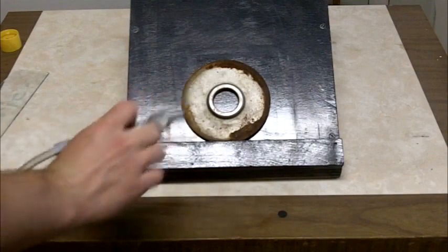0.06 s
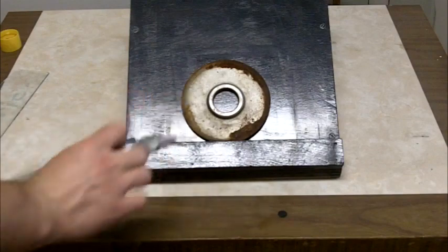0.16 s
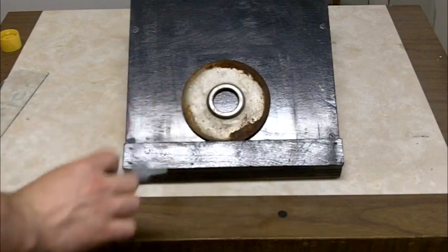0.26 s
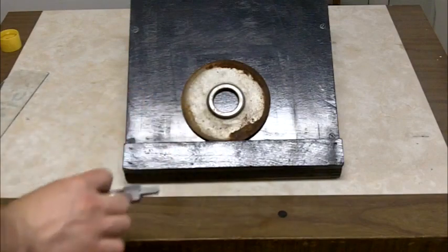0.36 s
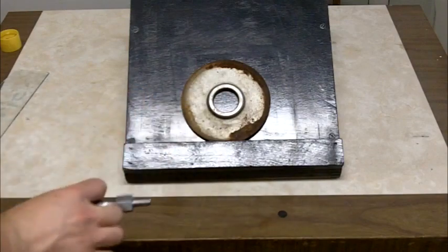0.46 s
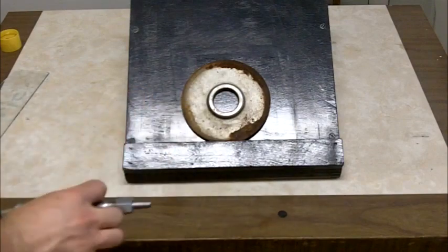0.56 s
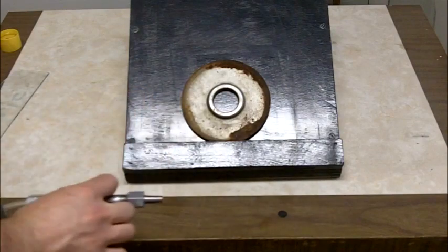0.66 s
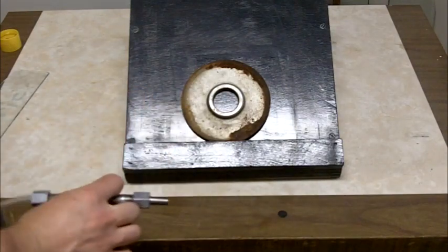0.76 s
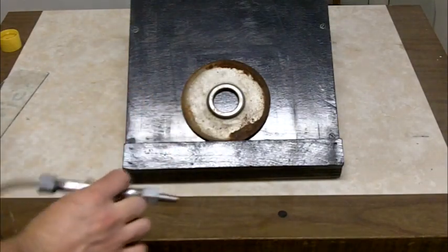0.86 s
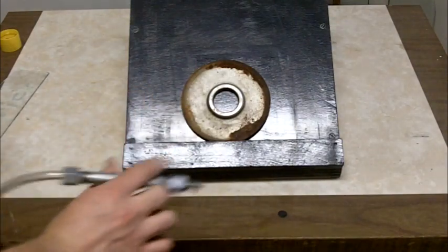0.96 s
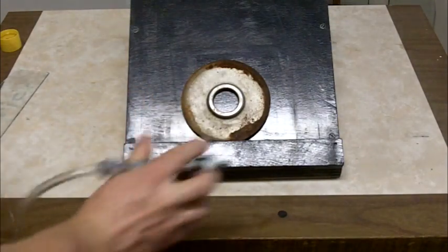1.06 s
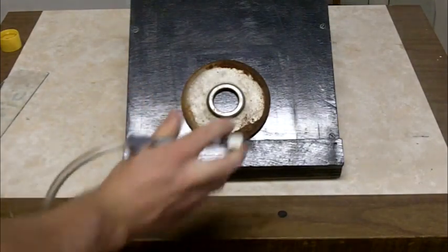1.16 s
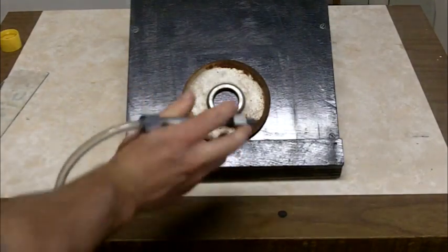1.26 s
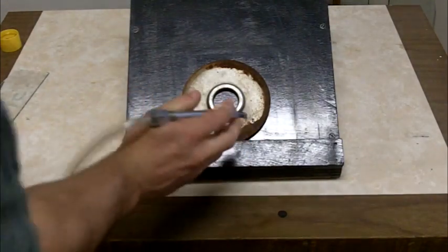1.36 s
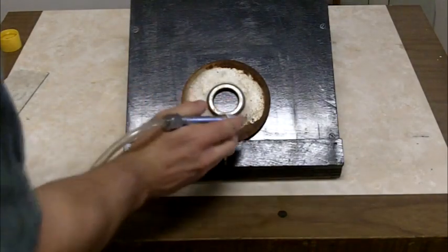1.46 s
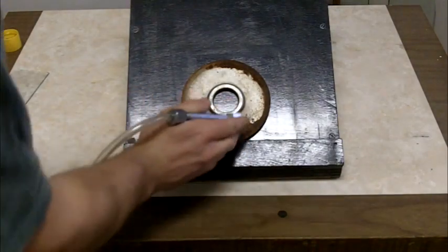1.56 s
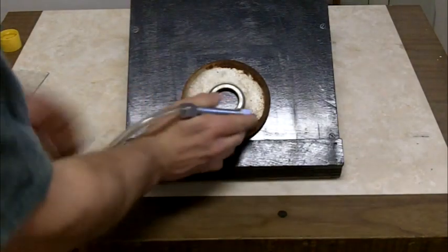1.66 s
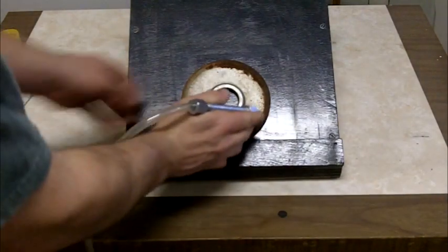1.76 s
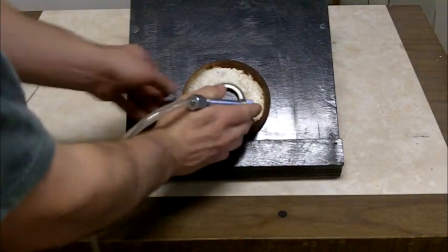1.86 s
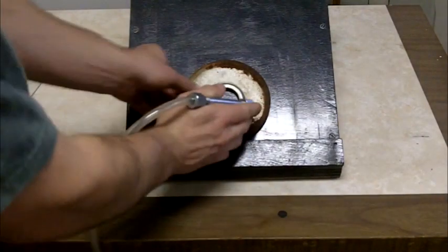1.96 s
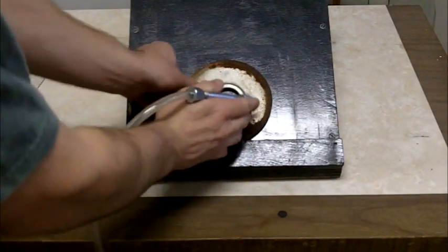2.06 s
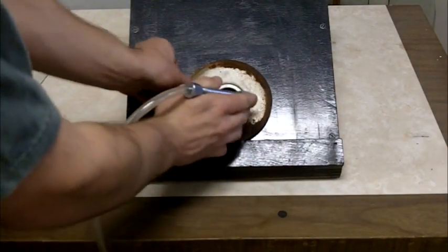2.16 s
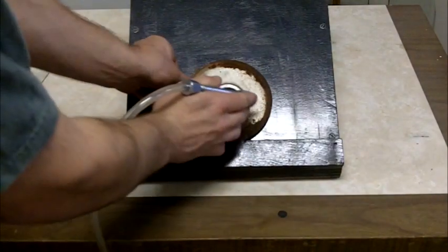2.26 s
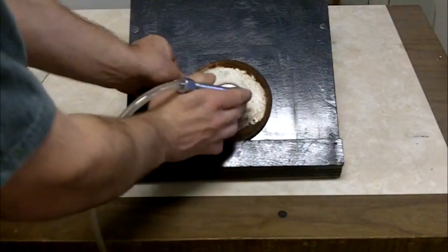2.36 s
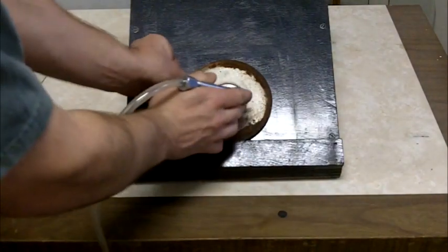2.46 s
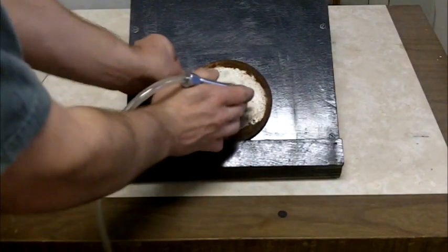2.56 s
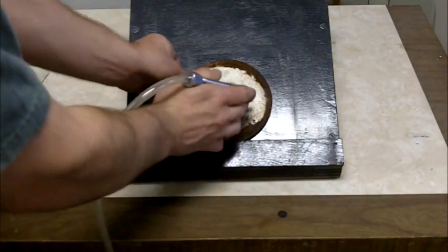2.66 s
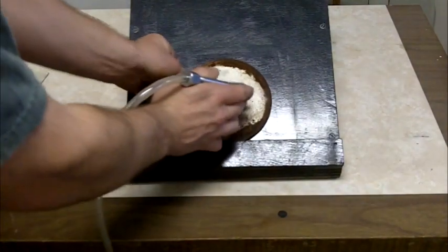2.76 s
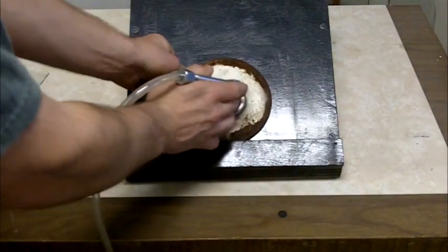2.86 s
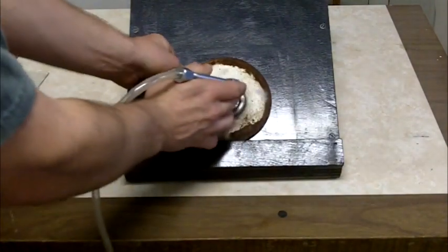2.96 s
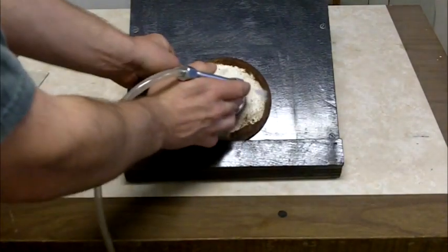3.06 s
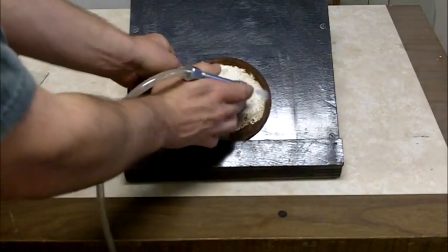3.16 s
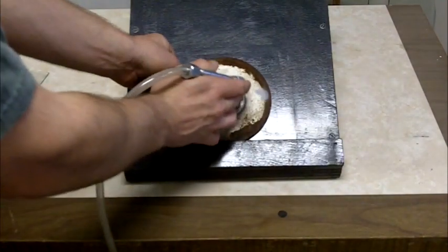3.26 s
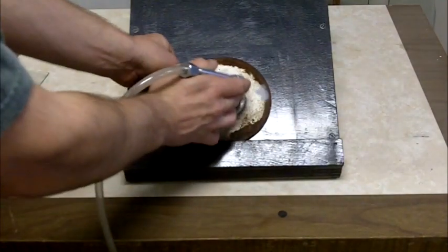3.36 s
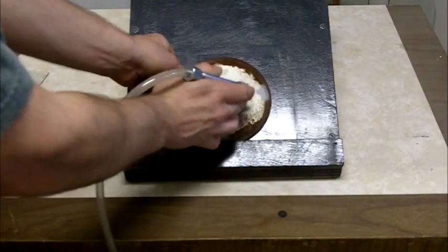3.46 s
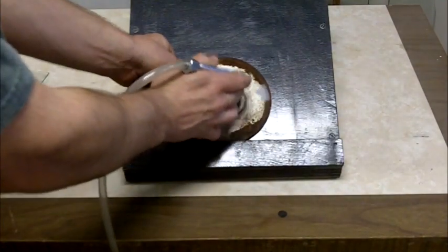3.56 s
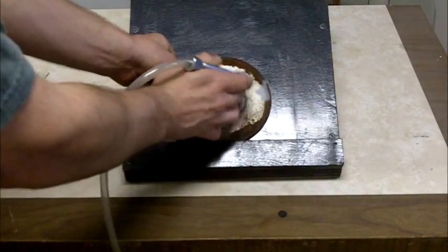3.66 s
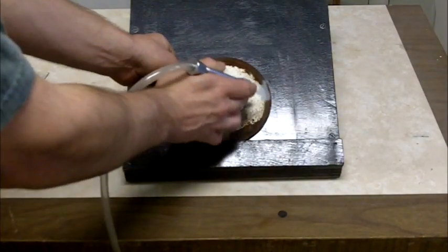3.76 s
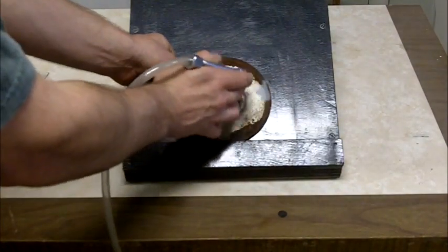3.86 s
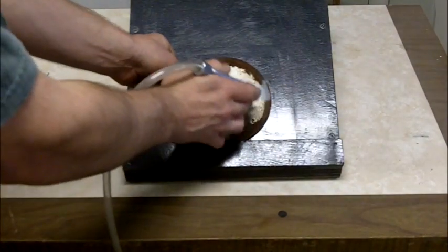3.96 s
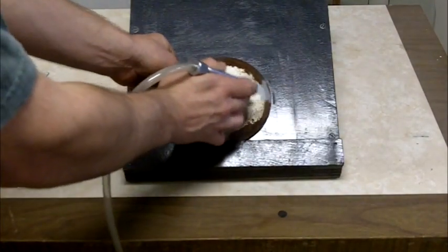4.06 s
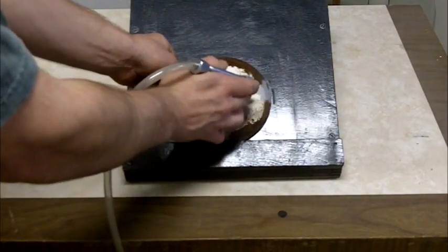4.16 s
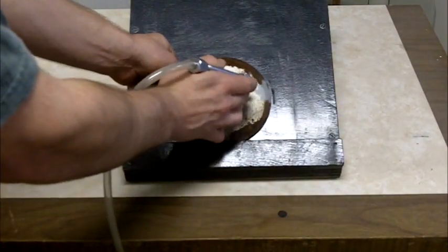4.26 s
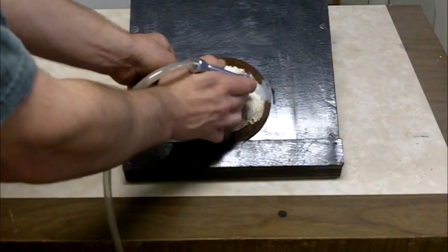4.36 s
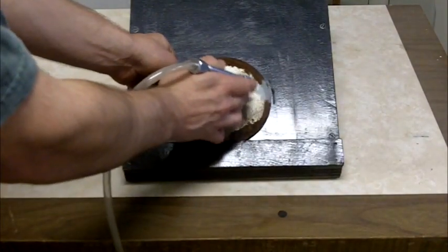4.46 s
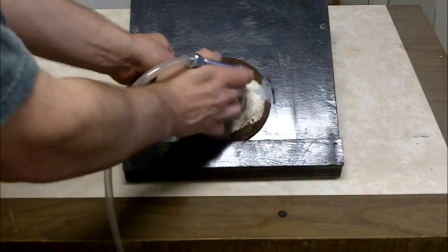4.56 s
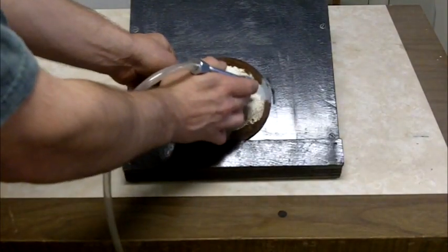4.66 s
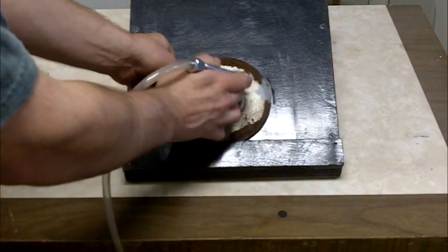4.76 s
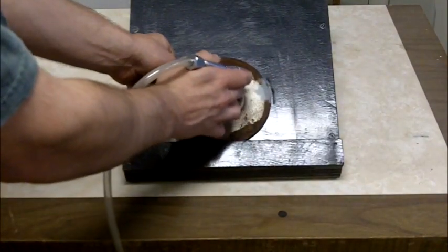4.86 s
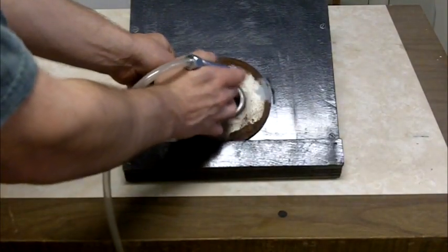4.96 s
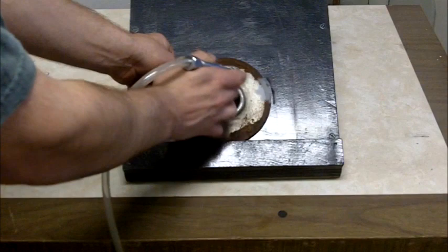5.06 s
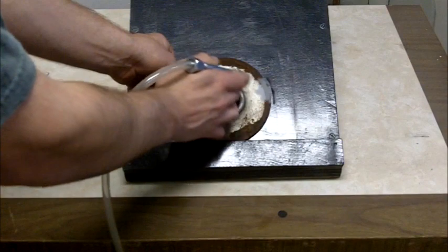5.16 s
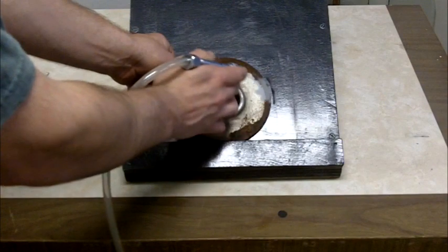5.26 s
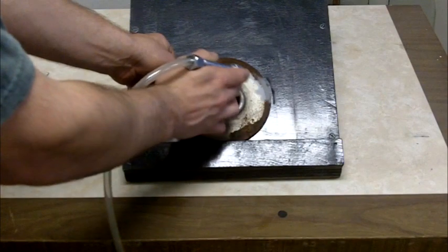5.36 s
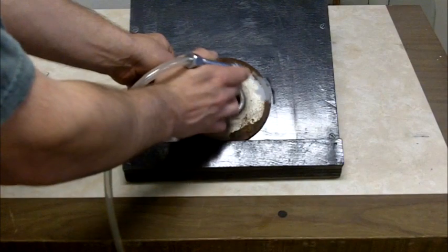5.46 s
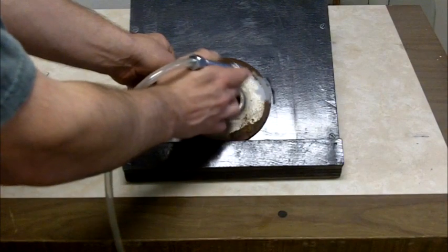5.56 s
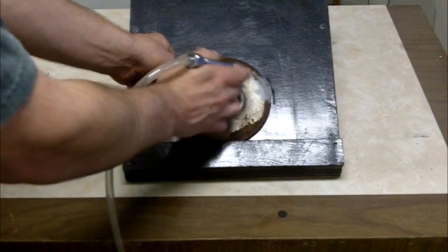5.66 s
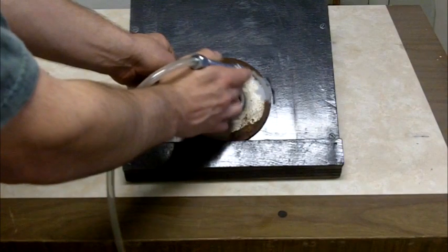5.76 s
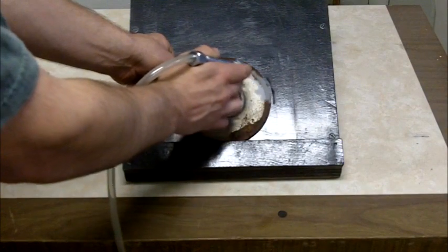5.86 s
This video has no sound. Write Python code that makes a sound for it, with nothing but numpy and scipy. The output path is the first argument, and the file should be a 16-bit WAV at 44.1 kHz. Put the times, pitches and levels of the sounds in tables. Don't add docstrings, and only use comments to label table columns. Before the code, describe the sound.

Close camera microphone at a workbench. Sparse wooden thumps, metallic taps and low groaning of the bench come first, over faint room hiss. A rough rubbing scrape ends in a metal tick. About two seconds in, pressurised air and grit rush out abruptly, loud and bright, weakening and spitting once before settling into a fluttering, surging spray with occasional low air thumps. It is still running at the end.

```python
import sys
import numpy as np
from scipy import signal
from scipy.fft import rfft, irfft
from scipy.io import wavfile
from scipy.ndimage import uniform_filter1d, map_coordinates

SR = 44100
rng = np.random.default_rng(int(sys.argv[2]) if len(sys.argv) > 2 else 0)


def ratio_of_db(decibels):
    return 10 ** (np.asarray(decibels, float) / 20)


def persist_wave(psi):
    counts = np.round(np.clip(psi, -1, 1) * 32767).astype(np.int16)
    wavfile.write(sys.argv[1], SR, np.atleast_2d(counts).T)


N = 260631
TIME = np.arange(N) / SR
HOP = 64


def tone(points, hz):
    point_hz, db = np.transpose(points)
    return np.interp(np.log(hz + 1), np.log(point_hz), db)


def colour(x, points):
    y = irfft(rfft(x) * ratio_of_db(tone(points, np.fft.rfftfreq(len(x), 1 / SR))), len(x))
    return y / np.std(y)


def noise(points):
    return colour(rng.standard_normal(N), points)


def walk(shape, span):
    field = rng.standard_normal(shape)
    for axis, k in enumerate(span):
        k = max(int(k), 1)
        field = uniform_filter1d(uniform_filter1d(field, k, axis=axis), k, axis=axis)
    return field / np.std(field)


def grains(per_s, scatter_db):
    size_db = np.minimum(scatter_db * rng.exponential(size=N), 9)
    x = (rng.random(N) < per_s / SR) * rng.uniform(-0.88, 1, N) * ratio_of_db(size_db)
    return x / np.std(x)


def add(out, start_s, x):
    i = int(start_s * SR)
    out[i:i + len(x)] += x[:N - i]


def swells(rows, rise, fall):
    t = TIME[::HOP]
    gain = sum(ratio_of_db(db - np.where(t < s, rise, fall) * np.abs(t - s)) for s, db in rows)
    return np.interp(TIME, t, gain)


def ring(hz, db, t60, push_s, rough_db):
    t = np.arange(SR // 2) / SR
    hz, db, t60 = (np.reshape(v, (-1, 1)) for v in (hz, db, t60))
    flutter_db = rough_db * walk((len(hz), len(t)), [1, 250])
    modes = ratio_of_db(db - 60 * t / t60 + flutter_db) * np.sin(2 * np.pi * (hz * t + rng.random(hz.shape)))
    return modes.sum(axis=0) * (1 - np.exp(-t / push_s))


def crack(hz, db, t60, push_s):
    t = np.arange(SR // 3) / SR
    burst = colour(rng.standard_normal(len(t)), [(hz / 4, -14), (hz, 0), (hz * 3.2, -9), (hz * 8, -40)])
    return burst * ratio_of_db(db - 60 * t / t60) * (1 - np.exp(-t / push_s))


def gain_control(duck_db, start_s=2.4):
    return np.interp(TIME, [start_s, 2.6], [0, duck_db])


# freq_hz, level_db (per Hz)
ROOM_TONE = [(110, -7.5), (180, -3.5), (292, -10), (343, -3), (491, -34), (741, -16.5), (2640, -34),
             (3100, -29), (5500, -28.5), (6580, -20.5), (8930, -24.5), (13000, -44)]


def room_hiss():
    return ratio_of_db(-60.5) * noise(ROOM_TONE + [(15300, -45)])


WHINE_GAPS = [.54, .66, .87, 1.47, 1.57, 1.66, 1.79, 1.922, 2.24]


def camera_whines():
    whine_hz, whine_db, fade_db_s, gap_s = 9080, -69.5, 1, 0.02
    buzz_hz, buzz_db, frame_hz = 3150, -73.5, 29.97
    gaps_db = sum(-18 * np.exp(-((TIME - s) / gap_s) ** 2) for s in WHINE_GAPS)
    level_db = whine_db - fade_db_s * TIME + gaps_db + 1.5 * walk((N,), [1500])
    whine = ratio_of_db(level_db) * np.sin(2 * np.pi * whine_hz * TIME)
    gate = uniform_filter1d(1. * ((TIME * frame_hz + .1) % 1 < .45), 60)
    return whine + ratio_of_db(buzz_db) * gate * np.sin(2 * np.pi * buzz_hz * TIME)


# freq_hz, level_db (per Hz)
PREAMP_TONE = [(35, -27), (60, 14.5), (129, -12), (648, -19), (938, -16.5), (3580, -26), (4840, -33),
               (7860, -27), (15000, -28)]


def preamp_side():
    return noise(PREAMP_TONE) * ratio_of_db(-66.5 + gain_control(-8))


# peak_s, level_db
STEPS = [(.1, -49), (.41, -47), (.68, -68), (.87, -42), (1.12, -45), (1.28, -57), (1.6, -71), (1.8, -46),
         (2.12, -43), (2.3, -44.5), (2.48, -56)]
# peak_s, level_db
LEANS = [(.07, -39), (.62, -48), (.84, -51), (1.0, -61.5), (1.15, -45), (1.53, -48), (1.76, -47.5),
         (1.86, -53), (2.05, -53), (2.2, -54), (2.32, -49), (2.47, -51)]
# peak_s, level_db
GUSTS = [(2.67, -69), (2.88, -57), (3.52, -65), (3.8, -61), (4.0, -67), (4.21, -62), (4.4, -65),
         (4.73, -57), (4.95, -68), (5.28, -61), (5.55, -75), (5.7, -71), (5.91, -72)]


def rumble_and_groans():
    rumble = noise([(10, -20), (23, 9.5), (34, 0), (58, -10), (200, -48), (2000, -56), (12000, -75)])
    groan = noise([(50, -20), (95, 24.0), (140, 15.5), (200, -27.0), (350, -36), (8000, -34), (15000, -47)])
    bed = ratio_of_db(-51.5 + gain_control(-16, start_s=2.35) + 2.5 * walk((N,), [3000]))
    steps = swells(STEPS, 74, 110) * ratio_of_db(-4.5)
    leans = swells(LEANS, 160, 98)
    gusts = swells(GUSTS, 160, 230)
    return (bed + steps + gusts) * rumble + (leans + gusts * ratio_of_db(-2)) * ratio_of_db(-8.0) * groan


# start_s, peak_db, pitch_hz, t60_s, crack_db (relative)
KNOCKS = [
    (0.007, -24, 336, 0.076, -13),
    (0.057, -46, 370, 0.21, -16),
    (1.118, -28.5, 360, 0.055, -9),
    (1.474, -44.5, 429, 0.14, -10),
    (1.737, -43.5, 322, 0.17, 2),
    (1.762, -38, 343, 0.15, -15),
    (2.204, -39, 296.3, 0.2, -3),
    (2.234, -42.5, 328, 0.11, 2),
    (2.357, -37.5, 346, 0.063, 2),
    (2.399, -46, 303, 0.11, 13),
]
# pitch_multiple, level_db
BENCH_MODES = [(0.578, -7), (1.003, 2), (1.7, -11.5), (2.1, -11), (3.5, -15)]


def bench_knocks():
    out = np.zeros(N)
    multiple, share_db = np.transpose(BENCH_MODES)
    for s, db, hz, t60, crack_db in KNOCKS:
        add(out, s, ring(hz * multiple, db - 5.5 + share_db, t60 / np.sqrt(multiple), 0.0025, 6.3))
        add(out, s, crack(1700, db + crack_db - 9.5, 0.022, 0.0012))
        add(out, s, crack(460, db - 23.0, 0.68, 0.013))
    return out


# peak_s, peak_db, fall_db_per_s, swish_db (relative)
RUSTLES = [(0.013, -38, 350, -17), (.11, -48, 200, -8), (.37, -59.5, 20.5, -26), (.82, -80, 150, 25),
           (.93, -64, 64, 4), (1.0, -77, 152, 14), (1.125, -64, 96, 7), (1.43, -68, 91, 20),
           (1.739, -52, 188, 0), (1.821, -49.5, 450, 3.5), (1.901, -59.5, 9, 6), (2.4, -55.5, 300, 24.5)]


def cloth_rustle():
    cloth = noise([(150, -29), (300, 10.0), (900, 4.5), (2000, -4.5), (6000, -41), (12000, -60)])
    swish = noise([(1200, 4.5), (2200, 14), (4500, -2), (9000, -27), (14000, -60)])
    cloth_gain = sum(swells([(s, db)], 2200, fall) for s, db, fall, swish_db in RUSTLES)
    swish_gain = sum(swells([(s, db + swish_db - 10.0)], 2200, fall) for s, db, fall, swish_db in RUSTLES)
    return ratio_of_db(1.1 * walk((N,), [300])) * (cloth_gain * cloth + swish_gain * swish)


# start_s, peak_db
CLANKS = [
    (0.0862, -27),
    (.095, -30),
]
# freq_hz, level_db, t60_s
STEEL_MODES = [(818, -4, .25), (947, -12, 0.25), (1212, 3, 0.57), (1400, -12, 0.32), (1545, -3, 0.45),
               (1710, -11, 0.36), (1950, -9, 0.39), (2450, -6, 0.45), (2765, -19, 0.23), (3257, -15, 0.17),
               (3750, -7, 0.12), (6654, -22, .06)]


def tray_clank():
    out = np.zeros(N)
    hz, mode_db, t60 = np.transpose(STEEL_MODES)
    s, db = CLANKS[-1]
    add(out, s, ring(hz, db + mode_db - 18.5, 1.15 * t60, .001, 2.5))
    for s, db in CLANKS:
        add(out, s, ring(hz, db + 0.9 * mode_db - 7.0, 0.053, 0.0012, 2.6))
        add(out, s, crack(1900, db - 6.0, 0.031, 0.00065))
        add(out, s, crack(1060, db - 20, 0.51, 0.0037))
    return out


# start_s, end_s, pitch_hz, level_db
HUMS = [
    (0.51, 0.755, 97, -60),
    (1.968, 2.323, 126.7, -50.5),
    (1.985, 2.26, 156.2, -59),
    (2.352, 2.431, 126, -48),
]


def frame_hum():
    out = np.zeros(N)
    for start, end, hz, db in HUMS:
        swell = np.interp(TIME, [start, start + 0.035, end - .04, end], [0, 1, 1, 0])
        phase = 2 * np.pi * np.cumsum(hz * (1 + 0.013 * walk((N,), [900]))) / SR
        out += swell * ratio_of_db(db + 1.5 + 2.4 * walk((N,), [900])) * np.sin(phase)
    return out


# start_s, peak_db, pitch_hz, t60_s, crack_db (relative)
TICKS = [(.785, -60, 2500, .04, 6), (0.816, -51.5, 1770, 0.047, 7.5), (0.829, -60, 3020, .05, 8),
         (.915, -57, 2800, .05, 5), (0.997, -57, 3020, 0.054, 7), (1.05, -64, 3600, .05, -6),
         (1.165, -52, 1990, .12, -15), (1.19, -55, 2180, 0.1, -13), (1.381, -37.5, 820, 0.056, 4.5),
         (1.473, -28, 1800, 0.033, -8), (1.7, -56, 3460, .05, 4), (1.815, -43.5, 1820, 0.062, -4),
         (2.021, -61, 2540, 0.16, 11), (2.079, -49.5, 3070, 0.071, 3), (2.225, -51, 9900, 0.054, -2)]


def fitting_ticks():
    out = np.zeros(N)
    for s, db, hz, t60, crack_db in TICKS:
        rise_s = 0.03 * t60
        add(out, s, ring([hz, hz + 70], [db - 7.5, db - 11], [t60, t60 * 0.88], rise_s, 6.9))
        add(out, s, crack(hz, db + crack_db - 7.0, t60 * 1.1, rise_s))
    return out


# freq_hz, level_db (per Hz)
SCRAPE_TONE = [(150, -47), (250, -10.5), (710, -1), (995, -3.5), (1260, 4), (1680, -10), (1820, -6.5),
               (4610, -8.5), (5540, -9), (7020, -14.5), (14000, -46)]


def hose_scrape():
    bite_s, full_s, catch_s = 1.385, 1.42, 1.468
    end_s = catch_s + .02
    drag_db = -45 + np.interp(TIME, [bite_s, full_s, catch_s, end_s], [-5, 2.5, -2.0, -5.5])
    drag_db = drag_db - 640 * np.maximum(bite_s - TIME, 0)
    drag_db = drag_db - 124 * np.maximum(TIME - end_s, 0)
    rub = rng.standard_normal(N) + 0.55 * grains(1500, 7.7)
    body = ratio_of_db(drag_db + 2.0) * colour(rub, SCRAPE_TONE)
    treble = colour(rub, [(5000, -23), (6500, -0.5), (9000, -10), (14000, -32)])
    return body + swells([(full_s, -51)], 260, 110) * treble


# time_s, jet_db, grit_richness_db, tray_spray_db
FLOW = [(2.33, -69.5, -8, -3), (2.39, -31, -8, 3.5), (2.43, -22, -7, 5), (2.49, -21.5, -7.5, 1),
        (2.58, -28, -9, -0.5), (2.76, -31.5, -7, 0.5), (2.86, -31, 1, -0.5), (2.96, -22, 1, 2),
        (3.15, -29.5, -8, -0.5), (3.25, -37.5, -3, 1.5), (3.4, -40.5, -2, 2), (3.51, -32, -5, 2),
        (3.63, -30, -3, 1), (3.95, -29.5, 0.5, 1.5), (4.3, -29, 3, -1.5), (4.7, -29, 2.5, 0),
        (5.2, -29, 0, -2), (5.91, -29.5, 0.5, 1.5)]
# peak_s, extra_db, half_width_s
SURGES = [
    (3.78, 4, 0.044),
    (3.86, -2.5, 0.058),
    (4.04, 1.8, 0.017),
    (4.39, 1.8, 0.031),
    (4.5, -2, 0.078),
    (4.739, 5, 0.062),
    (4.81, -3, 0.071),
    (4.93, 1.5, 0.04),
    (5.47, -2, 0.066),
    (5.84, 0, 0.027),
]


def hose_flow(at_s):
    s, jet_db, grit_db, spray_db = np.transpose(FLOW)
    jet_db = np.interp(at_s, s, jet_db, -120, -120)
    jet_db = jet_db + sum(db * np.exp(-((at_s - peak) / half) ** 2) for peak, db, half in SURGES)
    return jet_db, np.interp(at_s, s, grit_db), np.interp(at_s, s, spray_db)


# start_s, extra_db, decay_s
SLUGS = [
    (2.35, 6, 0.015),
    (3.353, 5.5, 0.014),
    (3.397, 8.5, 0.016),
    (3.433, 4.5, 0.069),
    (3.513, 11, 0.01),
    (3.5165, 5, 0.062),
]


def grit_slugs():
    rise_s = 0.0016
    extra_db = np.zeros(N)
    for s, db, decay_s in SLUGS:
        extra_db += db * np.clip((TIME - s) / rise_s, 0, 1) * np.exp(-np.abs(TIME - s) / decay_s)
    return extra_db


# freq_hz, level_db (per Hz)
JET_TONE = [(120, -91), (200, -31.5), (593, -29), (723, -29), (836, -27.5), (1580, -22.5), (2140, -12),
            (3080, -13), (3500, -14.5), (4590, -9.5), (5400, -10), (5910, -7.5), (7090, -4.5), (10200, -7),
            (15200, -29)]
# freq_hz, width_hz, level_db
TRAY_MODES = [(2530, 220, -48), (3123, 90, 20), (4650, 290, -21), (6860, 1500, -17)]


def grit_jet():
    steady_db, tray_lag, wash_lag, valve_s = -33.5, 0.31, 0.58, 2.35
    source = rng.standard_normal(N) + 0.31 * grains(4000, 4.2)
    source = source * ratio_of_db(0.5 * walk((N,), [60]) + 0.49 * walk((N,), [500]))
    hz, s, z = signal.stft(source, SR, nperseg=8 * HOP, noverlap=7 * HOP)
    jet_db, grit_db, spray_db = hose_flow(s)

    behind_db = steady_db - jet_db
    tray_db = np.clip(behind_db, -12, 35) * tray_lag + spray_db
    wash_db = np.clip(behind_db, -12, 35) * wash_lag
    shift_db = np.array([wash_db, wash_db, tray_db, tray_db, 0 * s, 0 * s, grit_db, grit_db])
    edges_hz = [200, 1300, 1900, 5000, 6000, 9300, 11500, 16000]
    place = np.interp(np.log(hz + 1), np.log(edges_hz), np.arange(8))
    db = map_coordinates(shift_db, np.meshgrid(place, np.arange(len(s)), indexing="ij"), order=1)

    peaks_db = sum(np.clip(5.6 + 0.077 * d, 0, 9) / (1 + (2 * (hz - f) / w) ** 2) for f, w, d in TRAY_MODES)
    db = db + (tone(JET_TONE, hz) + peaks_db)[:, None]
    db = db + 1.23 * walk(z.shape, [6, 60]) + 0.72 * walk(z.shape, [2.5, 25])
    jet = signal.istft(z * ratio_of_db(db), SR, nperseg=8 * HOP, noverlap=7 * HOP)[1][:N]

    level_db = np.interp(TIME, s, jet_db) + grit_slugs() + 2.0
    valve = np.clip((TIME - valve_s) / 0.0018, 0, 1)
    return jet / np.std(jet) * ratio_of_db(level_db) * valve


# start_s, level_db, centre_hz, t60_s
PUFFS = [
    (2.9, -73, 150, 0.28),
    (3.4, -52.5, 222, 0.63),
    (3.506, -65, 120, 0.19),
    (3.759, -59, 140, 0.22),
    (4.691, -66, 60, 0.35),
    (4.715, -49, 130, 0.16),
    (5.882, -67, 100, 0.26),
]


def air_puffs():
    out = np.zeros(N)
    for s, db, hz, t60 in PUFFS:
        add(out, s, crack(hz, db, t60, 0.026))
    return out


def tail(t60, db):
    t = np.arange(SR // 2) / SR
    echo = colour(rng.standard_normal(len(t)), [(100, 4.0), (2000, -3.5), (12000, -8.5)])
    echo = echo * ratio_of_db(-60 * t / t60)
    return echo * (t > .004) * ratio_of_db(db) / np.sqrt(np.sum(echo ** 2))


def scene():
    hits = bench_knocks() + cloth_rustle() + tray_clank() + fitting_ticks() + hose_scrape()
    jet = grit_jet()
    wet = signal.fftconvolve(hits, tail(0.84, -13.0))[:N]
    wet = wet + signal.fftconvolve(jet, tail(.35, -13))[:N]
    low_end = rumble_and_groans() + frame_hum() + air_puffs()
    background = (room_hiss() + camera_whines()) * ratio_of_db(gain_control(-12))
    mid = hits + jet + wet + low_end + background
    side = preamp_side()
    return np.array([mid + side, mid - side])


def lopsided_capsule(x):
    skew, drift = 0.26, 0.63
    square = x ** 2
    slow = uniform_filter1d(square, 900, axis=1) - uniform_filter1d(square, 30000, axis=1)
    return x + skew * (square - uniform_filter1d(square, 6000, axis=1)) + drift * slow


# freq_hz, width_hz, depth_db
PORT_NOTCH = [
    (5400, 1000, -8),
    (5450, 220, -16),
]
# freq_hz, level_db
TOP_END = [(100, 0), (12500, 0), (15290, -3), (15450, -60)]
OFFSET = [.0152, .0008]


def port_and_converter(x):
    hz = np.fft.rfftfreq(N, 1 / SR)
    notch_db = sum(db / (1 + (2 * (hz - f) / w) ** 2) for f, w, db in PORT_NOTCH)
    x = irfft(rfft(x) * ratio_of_db(notch_db + tone(TOP_END, hz)), N) + np.array(OFFSET)[:, None]
    return x + ratio_of_db(-85) * noise([(3000, -7), (5400, -8), (8000, -12)])


def low_pass(x):
    return signal.sosfilt(signal.butter(12, 15310, fs=SR, output="sos"), x)


def record(dry):
    mix = port_and_converter(lopsided_capsule(dry))
    return low_pass(mix)


dry = scene()
out = record(dry)
persist_wave(out)
```